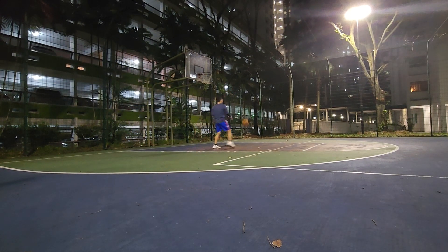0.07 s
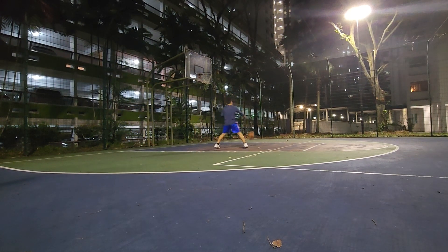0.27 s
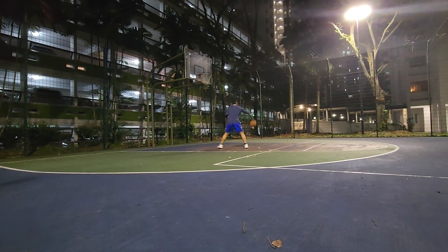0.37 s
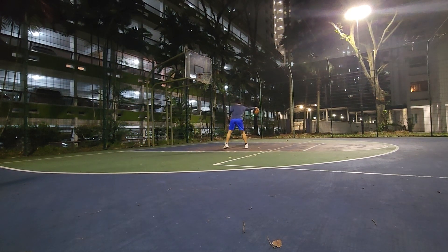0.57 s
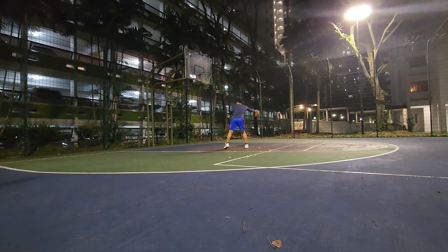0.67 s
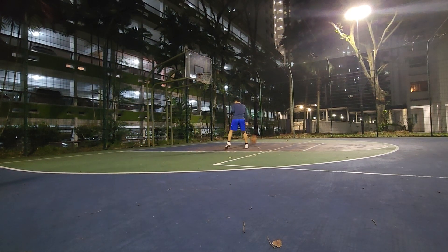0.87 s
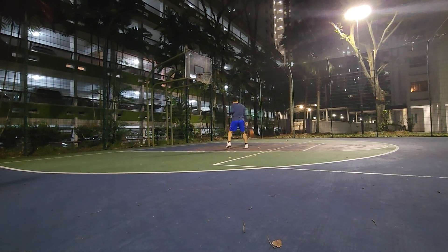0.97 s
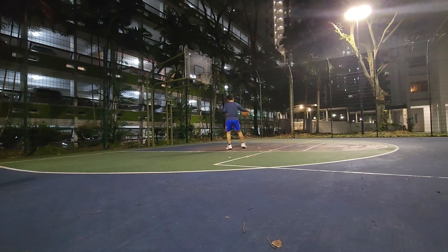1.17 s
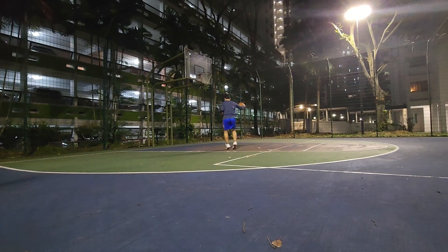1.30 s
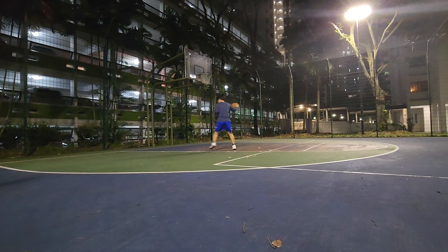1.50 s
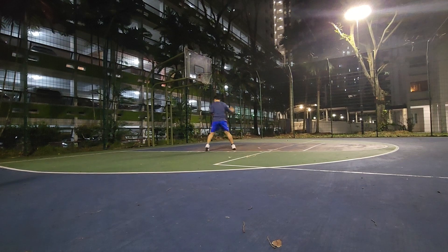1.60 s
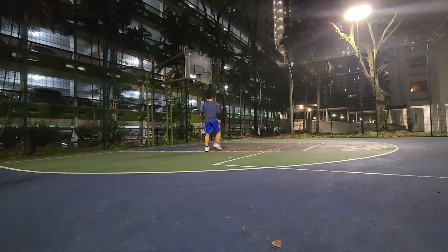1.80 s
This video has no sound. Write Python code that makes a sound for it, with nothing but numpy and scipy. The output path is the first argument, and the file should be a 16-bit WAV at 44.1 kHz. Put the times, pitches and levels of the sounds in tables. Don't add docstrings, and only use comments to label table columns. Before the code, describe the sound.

Two ringing basketball bounces, the first with a sharper slap, are split by a short high shoe squeak; gritty scuffs and soft footfalls follow over steady town rumble and hiss, miked at a distance outdoors.

```python
import sys
import numpy as np
from scipy import signal
from scipy.fft import rfft, irfft
from scipy.io import wavfile
from scipy.ndimage import uniform_filter1d

SR = 44100
rng = np.random.default_rng(int(sys.argv[2]) if len(sys.argv) > 2 else 0)


def amplitude_ratio(level_db):
    exponent = np.asarray(level_db, float) / 20
    return 10 ** exponent


def dump_mix(stems):
    frames = np.atleast_2d(stems).T
    limited = np.clip(frames, -1, 1)
    pcm = np.round(limited * 32767).astype(np.int16)
    wavfile.write(sys.argv[1], SR, pcm)


N = 81585


def read(points, hz):
    f, value = np.transpose(points)
    return np.interp(np.log(hz + 1), np.log(f + 1), value)


def evened(x):
    return x / np.sqrt(np.mean(x ** 2) + 1e-20)


def coloured(x, points):
    gain = amplitude_ratio(read(points, np.fft.rfftfreq(x.shape[-1], 1 / SR)))
    return irfft(rfft(x) * gain, x.shape[-1])


def drift(hz):
    low_pass = signal.butter(2, np.clip(hz, 1, 9000), fs=SR)
    return evened(signal.lfilter(*low_pass, rng.standard_normal(N)))


def swing(s, hz, width, order=2, lead=0):
    u = np.arange(N) / SR - s
    return np.cos(2 * np.pi * hz * u) * np.exp(-abs((u + lead) / width) ** order)


# [f/Hz, likeness -1 to 1]
LIKENESS = [(60, 1), (150, 0.83), (290, 0.98), (640, -0.15), (1400, 0.029), (3100, 0.22), (15000, -0.22)]
# [f/Hz, level/dB per Hz]
TOWN_SPECTRUM = [(20, -16), (60, -0.5), (110, -1), (260, -15), (420, -19), (900, -16.5), (3000, -36),
                 (16000, -56.5)]
# [t/s, level/dB]
RUMBLE_SWELL = [(0, -2), (.2, 0), (.45, 1), (.65, 2), (.95, -3.5), (1.2, 1.5), (1.5, 1), (1.62, -5),
                (1.85, 1)]
TOWN_DB, LEFT_DB = -37.5, 1.8
RUMBLE_HZ = 220
SHELF_HZ, SHELF_DB = 11450, -5


def town():
    frames, hz = N // 256 + 5, np.fft.rfftfreq(1024, 1 / SR)
    a, b, c, d, patches = rng.standard_normal((frames, 513, 5)).T
    patches = uniform_filter1d(patches, size=10, axis=0)
    patches = evened(uniform_filter1d(patches, size=14, axis=1))
    swell = np.interp(np.arange(frames) * 256 / SR, *np.transpose(RUMBLE_SWELL))
    swell = swell / (1 + (hz[:, None] / RUMBLE_HZ) ** 2)
    same = np.clip(read(LIKENESS, hz), -1, 1)[:, None]
    left = a + 1j * b
    right = same * left + np.sqrt(1 - same ** 2) * (c + 1j * d)
    level = read(TOWN_SPECTRUM, hz) + SHELF_DB * (hz > SHELF_HZ)
    z = np.array([left, right]) * amplitude_ratio(level[:, None] + 0.92 * patches + swell)
    noise = signal.istft(z, nperseg=1024, noverlap=768)[1][:, :N]
    return amplitude_ratio(TOWN_DB) * evened(noise) * amplitude_ratio(LEFT_DB * np.array([[.5], [-.5]]))


# [t/s, level/dB, f/Hz, width/s]
FOOTFALLS = [(0.256, -31.5, 58.6, 0.031), (0.579, -26.5, 66.4, 0.012), (0.614, -30, 61.7, 0.024),
             (0.872, -37.5, 63, 0.05), (1.0, -33, 57.6, .04), (1.092, -35.5, 69.5, 0.083),
             (1.306, -31.5, 61, 0.023), (1.373, -28.5, 70, 0.012), (1.443, -31, 53.4, 0.038),
             (1.474, -21, 140, 0.0035), (1.508, -29.5, 80.8, 0.046), (1.58, -30, 56.5, 0.025)]
# [t/s, level/dB, f/Hz, width/s]
TICKS = [
    (.490, -47, 4300, .001),
    (.5275, -41, 2300, .0012),
    (.5435, -43, 2700, .001),
    (.932, -27, 4750, .0011),
         (1.2958, -21, 3760, 0.00013),
]
THUD_SPREAD_DB = 3


def steps():
    side = THUD_SPREAD_DB * rng.uniform(-0.48, 1, (len(FOOTFALLS), 1, 1))
    side = amplitude_ratio(side * np.array([[1], [-1]]))
    out = np.zeros((2, N))
    for left_right, (s, db, hz, width) in zip(side, FOOTFALLS):
        out += left_right * amplitude_ratio(db) * swing(s, hz, width)
    for s, db, hz, width in TICKS:
        out += amplitude_ratio(db) * swing(s, hz, width)
    return out


# [peak t/s, rise/s, fall/s, level/dB, brightness
DRAGS = [(.455, 0.015, 0.0081, -57, 0.5), (.645, 0.016, 0.032, -48.5, 0.6), (.72, .05, 0.057, -64, 0.8),
         (.79, 0.02, 0.035, -58, 0.2), (.90, 0.15, 0.075, -47.5, 0.33), (.97, 0.059, 0.043, -56.5, 1),
         (1.165, 0.015, 0.091, -59, 1.), (1.44, 0.012, 0.025, -46, 0), (1.477, 0.017, 0.0073, -39, 0.4),
         (1.548, 0.0022, 0.0086, -51, .3), (1.57, 0.01, .03, -52.5, 0.57), (1.835, .02, 0.046, -48, 0.14)]
# [f/Hz, level/dB per Hz]
DULL_GRIT = [(1500, -11.5), (3400, -4), (5000, -6), (9000, -16), (16000, -36)]
# [f/Hz, level/dB per Hz]
BRIGHT_GRIT = [(1500, -34), (4000, -12), (7000, 7), (10000, -5), (13500, -1), (16000, -3.5)]
GRIT_DB = 2.5


def scuffs():
    t, out = np.arange(N) / SR, np.zeros((2, N))
    grit = rng.standard_normal((3, N)) * amplitude_ratio(GRIT_DB * drift(720))
    grit = grit[:2] * 0.68 + grit[2] * 0.71
    dull, bright = evened(coloured(grit, DULL_GRIT)), evened(coloured(grit, BRIGHT_GRIT))
    for s, rise, fall, db, shine in DRAGS:
        shape = np.exp(-((t - s) / np.where(t < s, rise, fall)) ** 2)
        out += amplitude_ratio(db) * shape * ((1 - shine) * dull + shine * bright)
    return out


# [f/Hz, level/dB, t60/s]
SQUASHED_RING = [(854, -9.5, 0.0076), (1263, -0.5, 0.016), (1584, -6.5, 0.011)]
# [f/Hz, level/dB, t60/s]
FREE_RING = [(456, -6.5, 0.031), (824, -5.5, 0.023), (1052, -2.5, 0.019), (1424, -2.5, 0.015),
             (2000, -17, 0.021), (2960, -17, 0.0095)]
# [f/Hz, level/dB]
SKIN_CRACK = [(1200, 8), (2400, 1.5), (3300, 3.5), (4400, 3), (6000, -0.5), (10000, -6.5), (16000, -12)]
THUMP_HZ, THUMP_MID_S, THUMP_WIDTH_S = 137, .0073, .0058
CONTACT_S, LAND_RISE_S, LIFT_RISE_S = .0082, .0003, .0016
CRACK_GAP_S, SKIN_FADE_S = .0022, .0011


def bounce(s, thump_db, land_db, lift_db, first_db, second_db):
    u = np.arange(N) / SR - s
    on, off, late = np.maximum(u, 0), np.maximum(u - CONTACT_S, 0), u - CRACK_GAP_S
    landing, lifting = np.zeros(N), np.zeros(N)
    for hz, db, t60 in SQUASHED_RING:
        landing += amplitude_ratio(land_db + db - 60 * on / t60) * np.sin(2 * np.pi * hz * on)
    for hz, db, t60 in FREE_RING:
        lifting += amplitude_ratio(lift_db + db - 60 * off / t60) * np.sin(2 * np.pi * (hz * off + rng.random()))
    ring = (np.exp(-on / LAND_RISE_S) - 1) * landing
    ring += (1 - np.exp(-off / LIFT_RISE_S)) * lifting
    hold = amplitude_ratio(first_db) * (u > 0) * np.exp(-on / SKIN_FADE_S)
    hold += amplitude_ratio(second_db) * (late > 0) * np.exp(-abs(late) / SKIN_FADE_S)
    grit = rng.standard_normal((3, N))
    skin = hold * evened(coloured(grit[2] + 0.89 * grit[:2], SKIN_CRACK))
    thump = -amplitude_ratio(thump_db) * swing(s + THUMP_MID_S, THUMP_HZ, THUMP_WIDTH_S, order=4)
    return thump, ring + skin


# [landing t/s, thump level/dB, landing ring level/dB, lift-off ring level/dB]
DRIBBLE = [
    (0.467, -11.5, -20.5, -15.5),
    (1.1469, -11.5, -11, -19),
]
# [first level/dB, second level/dB]
SKIN_CRACKS = [
    (-20.5, -21),
    (-24, -30),
]
# [delay/s, level/dB]
WALL_ECHO = [
    (.0660, -3),
    (0.0734, -10),
]
# [f/Hz, level/dB]
WALL_COLOUR = [(500, -10), (2500, -20), (6000, -34), (16000, -44)]
WALL_LEAD_S = .0013


def ball():
    out = np.zeros((2, N))
    for row, cracks, (delay, db) in zip(DRIBBLE, SKIN_CRACKS, WALL_ECHO):
        thump, top = bounce(*row, *cracks)
        s, thump_db = row[0], row[1]
        echo = -amplitude_ratio(thump_db) * swing(s + THUMP_MID_S + delay, THUMP_HZ, 0.94 * THUMP_WIDTH_S,
                                      lead=WALL_LEAD_S)
        echo_top = coloured(np.roll(top, round(delay * SR), 1), WALL_COLOUR)
        out += thump + top + amplitude_ratio(db) * (echo + echo_top)
    return out


# [t/s, level/dB, stick-slip f/Hz, roughness 0-1]
SQUEAK_PATH = [
    (0.802, -34.5, 3425, 0.89),
    (0.826, -26, 3750, 0.9),
    (.835, -30, 4350, 0.77),
    (0.849, -24, 4030, 0.19),
    (.866, -26, 4200, 0.52),
    (0.878, -30.5, 4550, .5),
    (.888, -27, 4198, 0.05),
    (0.905, -30, 4844, .55),
    (.930, -42.5, 4560, 0.3),
]
OCTAVE_DB, CHATTER_HZ, WOBBLE, SQUEAK_END_S = -24, 400, .035, .003
STRAND, STRAND_DB, SKIRT_DB = 1.13, -12.5, -21
GRIP_S, LOOSE_DB = .8312, -13


def squeak():
    t, (s, db, hz, rough) = np.arange(N) / SR, np.transpose(SQUEAK_PATH)
    r = np.clip(np.interp(t, s, rough), 0, 1)
    slip_hz = np.interp(t, s, hz) * (1 + WOBBLE * r * 1.43 * np.tanh(drift(260)))
    turn = 2 * np.pi * np.cumsum(slip_hz) / SR
    chatter = (1 - r) + r * 1.66 * np.tanh(drift(CHATTER_HZ) / 1.23)
    gate = np.clip((t - s[0]) / 0.012 + 1, 0, 1) * np.exp(-np.maximum(t - s[-1], 0) / SQUEAK_END_S)
    gate *= amplitude_ratio(LOOSE_DB * np.clip((GRIP_S - t) / .001, 0, 1))
    tone = chatter * np.sin(turn)
    tone += amplitude_ratio(OCTAVE_DB) * abs(chatter) * (1 + 0.39 * drift(440)) * np.sin(2 * turn)
    tone += amplitude_ratio(STRAND_DB) * np.maximum(drift(99), 0) * drift(470) * np.sin(STRAND * turn)
    tone += amplitude_ratio(SKIRT_DB) * abs(chatter) * drift(2100) * np.cos(0.86 * turn)
    return np.sqrt(2) * amplitude_ratio(np.interp(t, s, db)) * gate * tone


WHINE_HZ, WHINE_WIDTH_HZ, WHINE_S = 13202, 49, 1.48
WHINE_DB, WHINE_FADE_DB_PER_S = -53, -30
WHINE_RIGHT_DB, WHINE_RIGHT_TURN = -10, 1.9


def whine():
    t = np.arange(N) / SR
    turn = 2 * np.pi * WHINE_HZ * t + np.array([[0], [WHINE_RIGHT_TURN]])
    tone = (1 + 0.6 * drift(WHINE_WIDTH_HZ)) * np.cos(turn)
    tone += .3 * drift(WHINE_WIDTH_HZ) * np.sin(turn)
    fade = amplitude_ratio(WHINE_DB + WHINE_FADE_DB_PER_S * np.maximum(t - 1.6, 0))
    level = np.clip((t - WHINE_S) / 0.048, 0, 1) * fade
    return level * tone * amplitude_ratio(np.array([[0], [WHINE_RIGHT_DB]]))


# [f/Hz, t60/s]
COURT_DECAY = [(60, 1), (150, 0.5), (500, 1), (1200, 1), (4200, 0.81), (9000, 1), (16000, 0.32)]
# [f/Hz, level/dB]
COURT_LEVEL = [(60, -25), (200, -10.5), (1000, -6.5), (4200, -8), (10000, -8.5)]
COURT_START_S = .007


def court(x):
    taps = rng.standard_normal((2, SR)) * (np.arange(SR) > COURT_START_S * SR)
    hz, t, z = signal.stft(taps, SR, nperseg=512)
    same = np.clip(read(LIKENESS, hz), -1, 1)[:, None]
    z[1] = same * z[0] + np.sqrt(1 - same ** 2) * z[1]
    t60 = read(COURT_DECAY, hz)[:, None]
    fade = amplitude_ratio(read(COURT_LEVEL, hz)[:, None] - 60 * t / t60)
    fade = fade / np.sqrt(t60 * SR / 14.7)
    tail = signal.istft(z * fade, SR, nperseg=512)[1]
    return signal.fftconvolve(x[None], tail, axes=1)[:, :N]


WALL_SQUEAK_S, WALL_SQUEAK_DB = .066, -19
NEAR_LEFT_DB, LEFT_LAG = 1.1, 2


def scene():
    hits, sole, drag = ball(), squeak(), scuffs()
    delay = round(WALL_SQUEAK_S * SR)
    wall = amplitude_ratio(WALL_SQUEAK_DB) * np.array([np.roll(sole, delay), np.roll(sole, delay + 4)])
    left, right = hits * amplitude_ratio(NEAR_LEFT_DB * np.array([[1], [-1]]))
    near = np.array([np.roll(left, LEFT_LAG), right])
    near = near + steps() + sole * amplitude_ratio(np.array([[-.5], [.5]]))
    tail = court(hits.mean(0) + sole + drag.mean(0))
    return near + wall + drag + tail + whine() + town()


def roll_off(x):
    return signal.sosfilt(signal.butter(12, 16520, fs=SR, output="sos"), x)


def record(dry):
    edge = signal.firwin(255, 16100, fs=SR)
    mix = signal.oaconvolve(dry, edge[None], "same")
    return roll_off(mix)


dry = scene()
out = record(dry)
dump_mix(out)
```